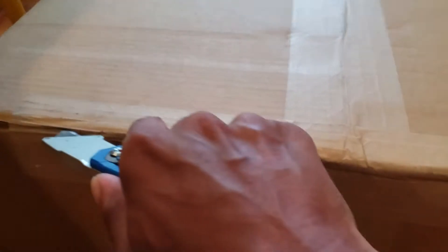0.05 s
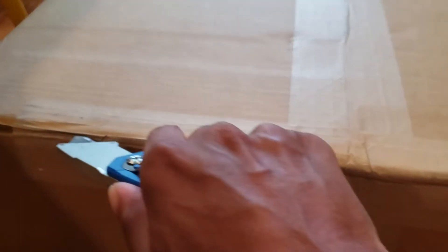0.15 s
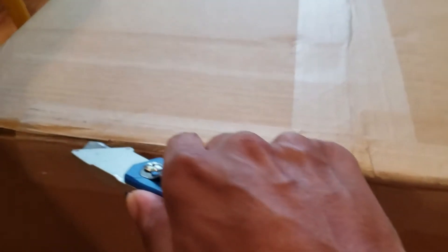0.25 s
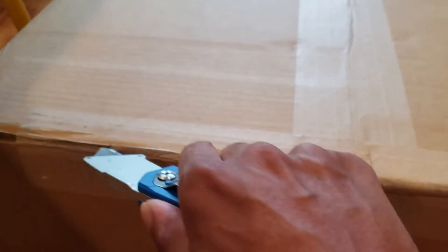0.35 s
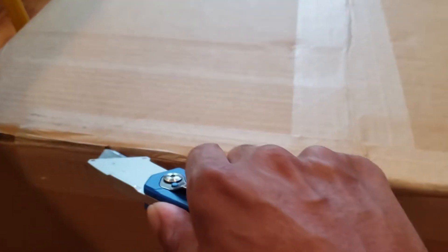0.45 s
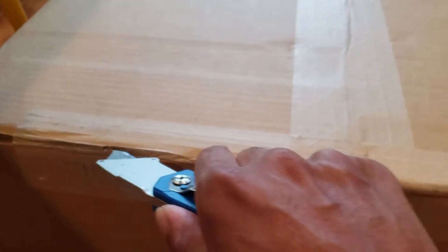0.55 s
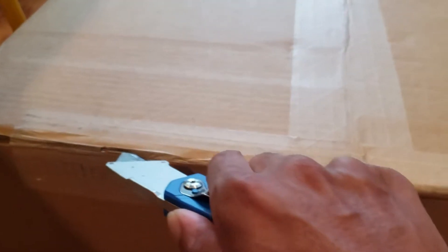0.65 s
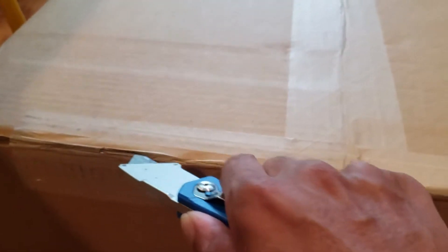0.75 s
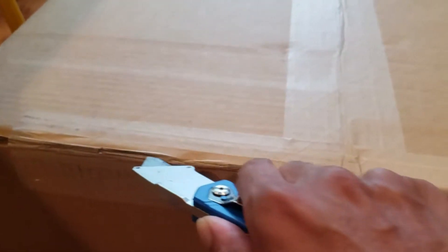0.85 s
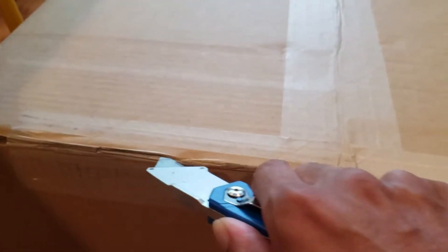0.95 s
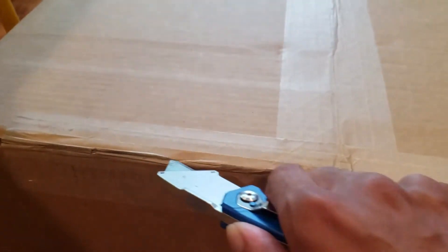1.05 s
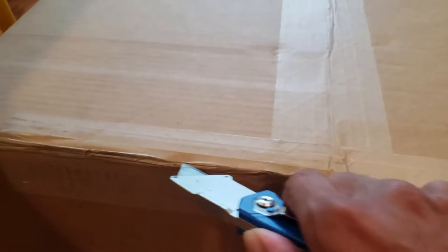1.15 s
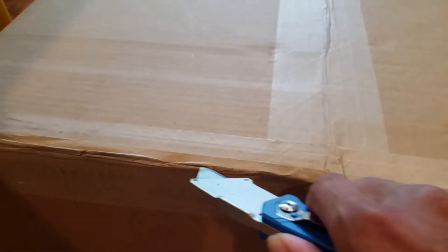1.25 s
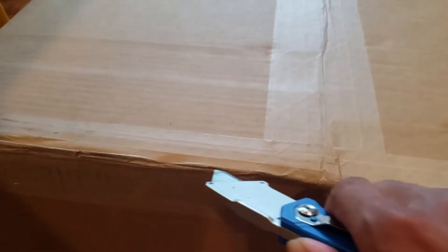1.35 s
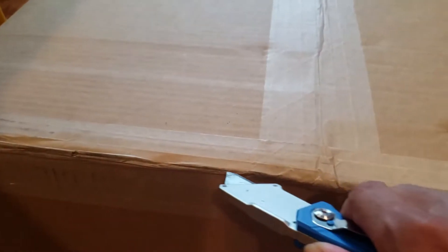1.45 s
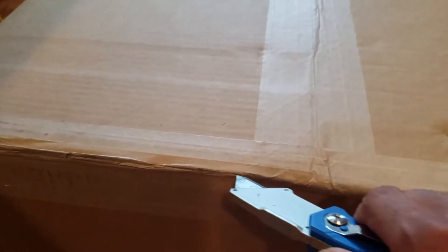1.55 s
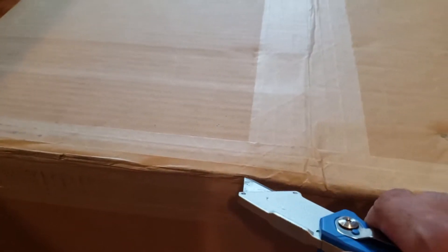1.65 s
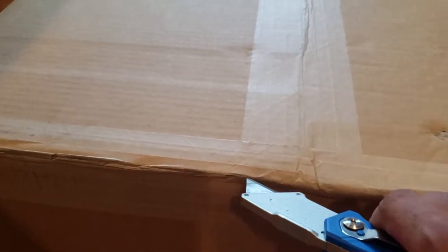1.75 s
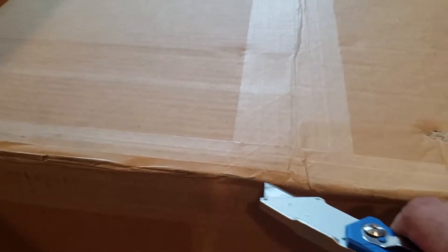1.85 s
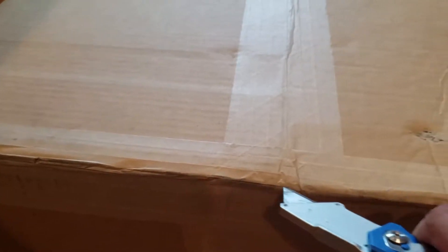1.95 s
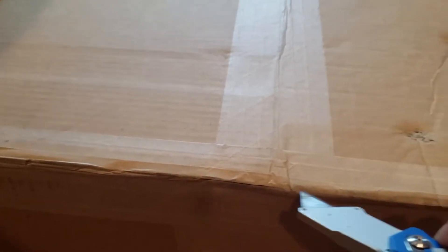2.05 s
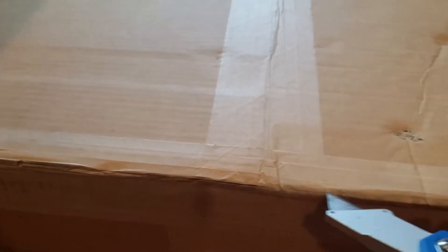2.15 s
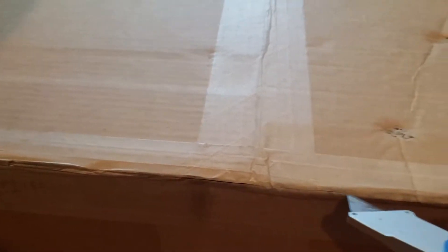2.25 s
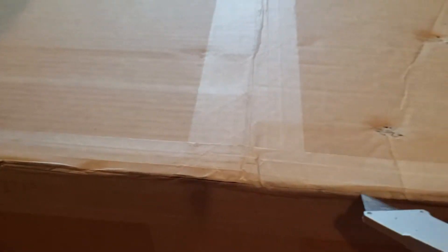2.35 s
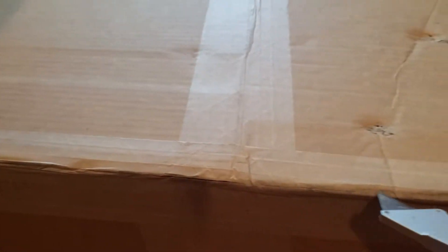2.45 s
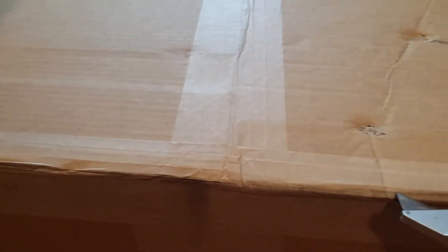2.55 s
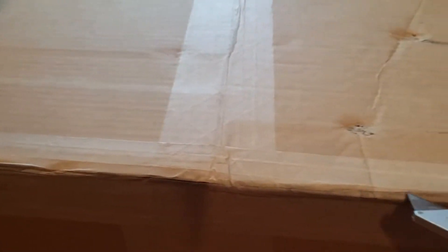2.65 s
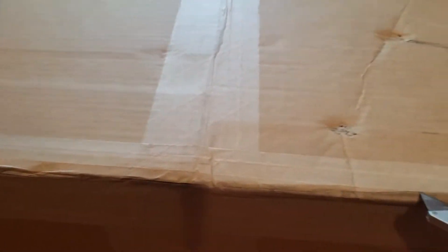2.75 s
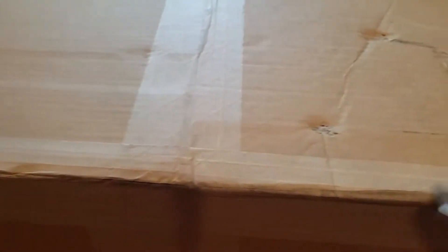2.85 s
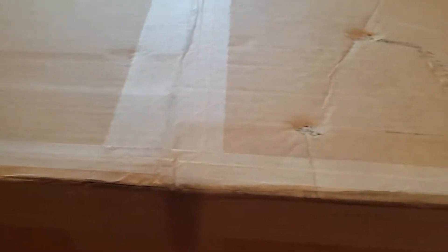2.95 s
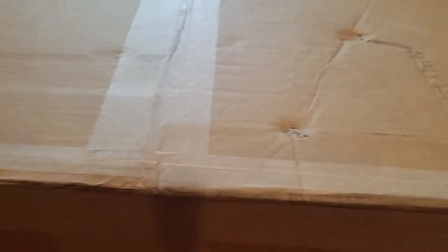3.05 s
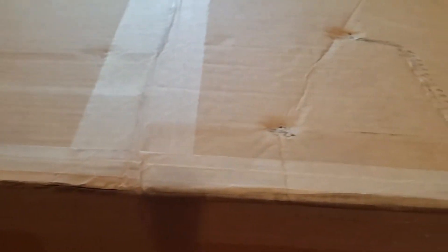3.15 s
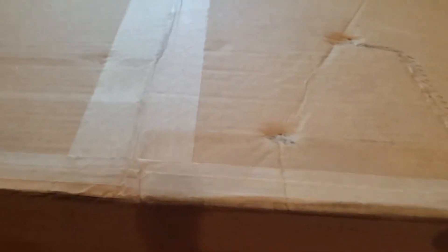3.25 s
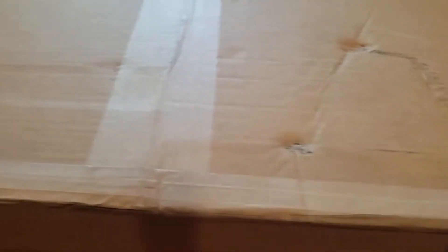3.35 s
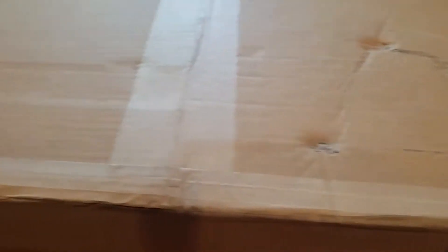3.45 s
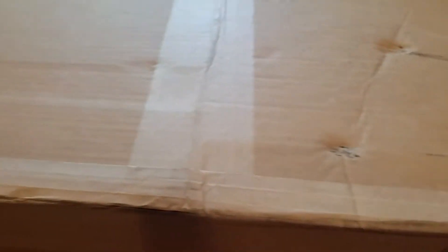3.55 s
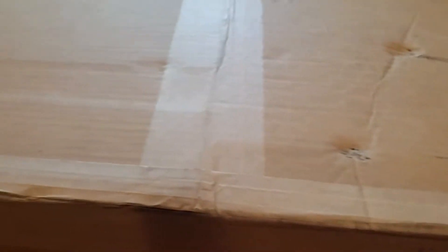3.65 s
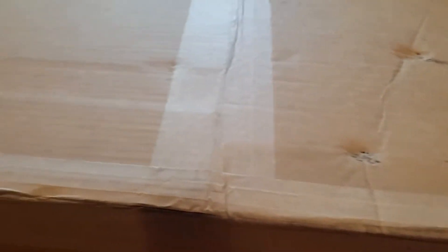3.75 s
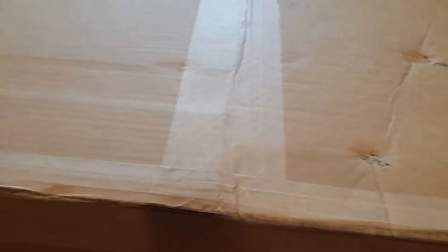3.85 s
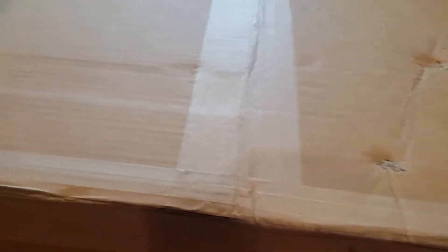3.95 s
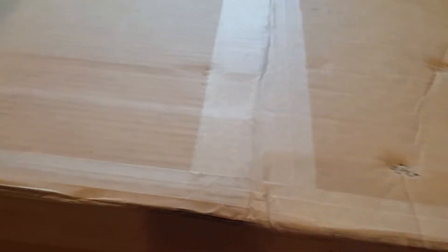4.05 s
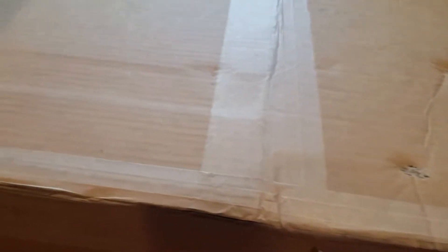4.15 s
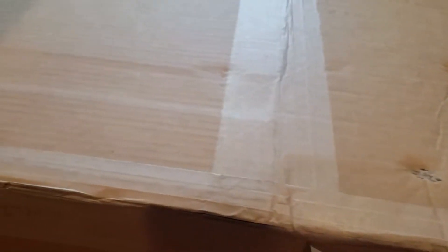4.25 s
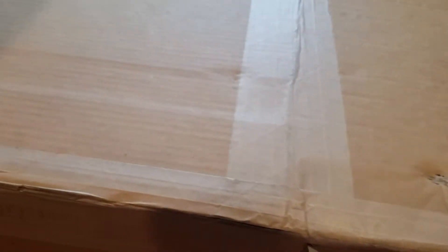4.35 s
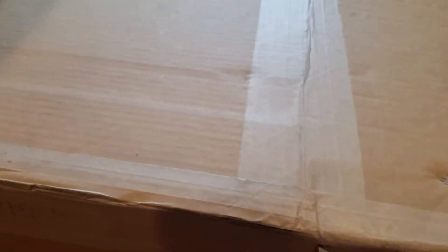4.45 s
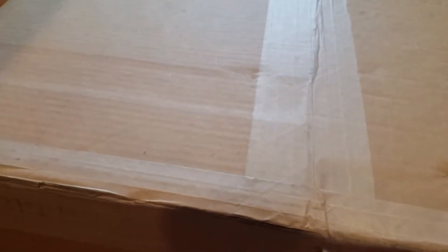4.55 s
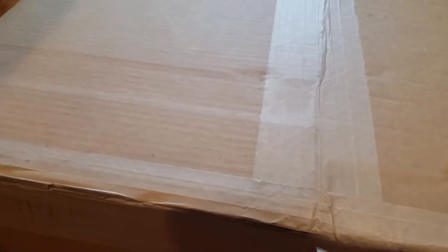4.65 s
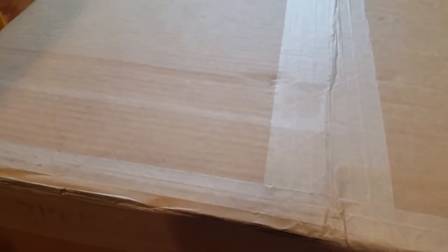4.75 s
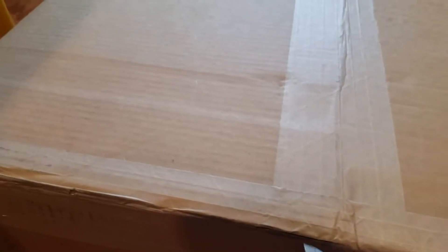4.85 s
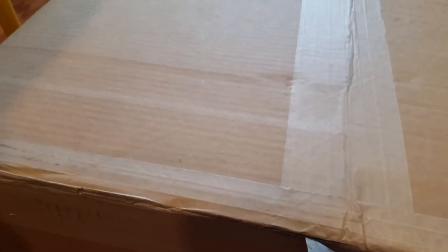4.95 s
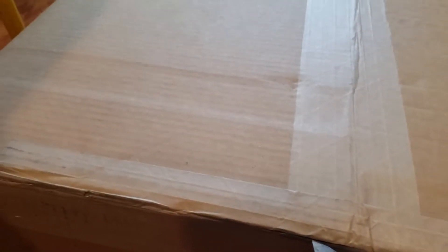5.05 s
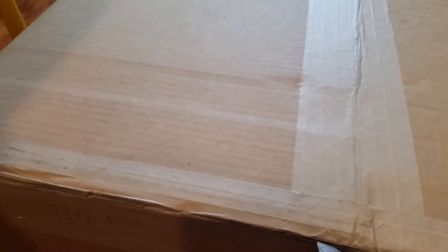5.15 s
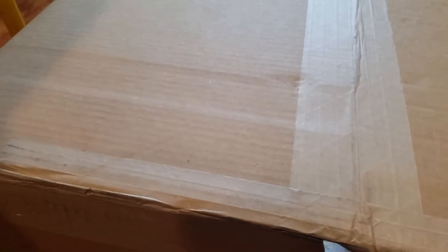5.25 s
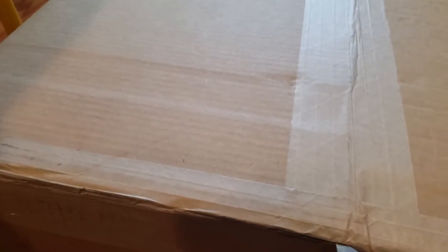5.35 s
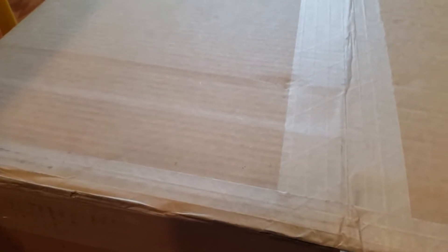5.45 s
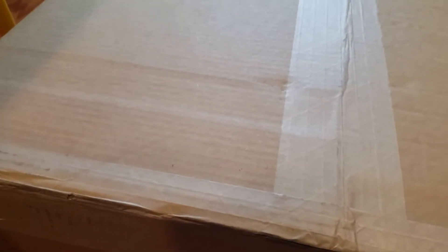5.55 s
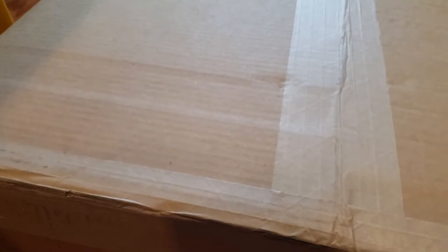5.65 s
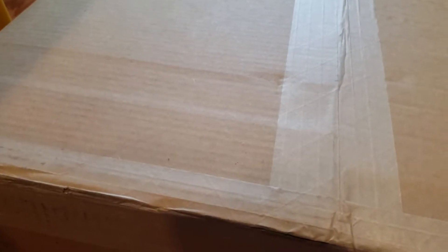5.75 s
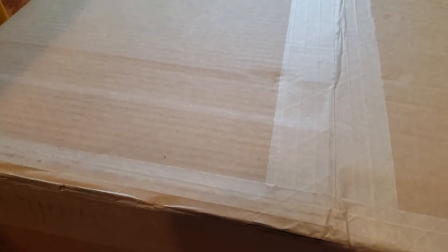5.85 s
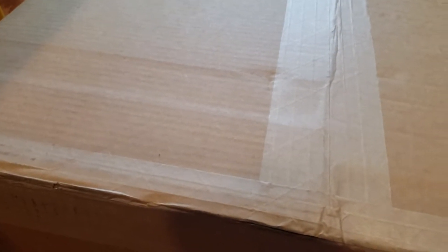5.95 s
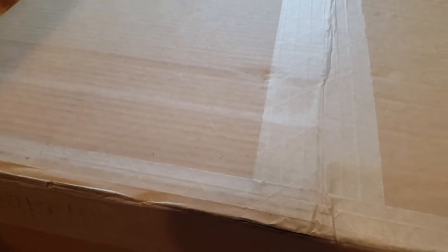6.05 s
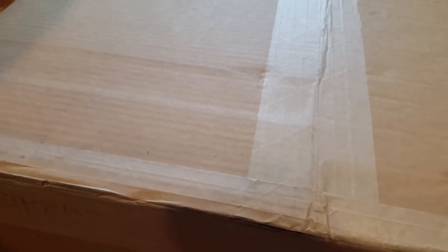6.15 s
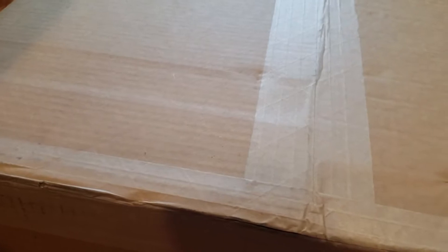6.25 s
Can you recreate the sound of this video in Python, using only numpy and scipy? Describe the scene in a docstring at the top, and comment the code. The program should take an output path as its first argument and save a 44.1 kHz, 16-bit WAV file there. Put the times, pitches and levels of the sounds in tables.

```python
"""In a small room, close by, a utility knife slits the packing tape along the edge of a cardboard box.
Stick-slip friction breaks film and fibres in tiny impulses: the tape crackles, the cut edge rasps and
the hollow box rumbles. The tip clicks on the board, and the lid thumps as the blade lets go.
One long cut with snags, a pause with a brief scuff and light clicks, then a second, harder cut,
all over a faint hum and hiss."""
import sys
import numpy as np
from scipy import signal
from scipy.fft import rfft, irfft
from scipy.io import wavfile

SR = 44100
rng = np.random.default_rng(int(sys.argv[2]) if len(sys.argv) > 2 else 0)


def generate_wav(sig):
    """Save sig (samples, or channels by samples) to the path in sys.argv[1] as 16-bit PCM at SR."""
    pcm = np.round(np.clip(np.atleast_2d(sig).T, -1, 1) * 32767).astype(np.int16)
    wavfile.write(sys.argv[1], SR, pcm)


N = 277429
TIME = np.arange(N) / SR
FILTER_SIZE = 8192
HZ = np.maximum(np.fft.rfftfreq(FILTER_SIZE, 1 / SR), 1)

# noise of the quiet room: (frequency [Hz], relative level [dB])
AMBIENT_SPECTRUM = [(15, -64), (25, -32.5), (41, -12.5), (64, -6.5), (76, -13), (82, -14), (134, -27),
                    (153, -29), (217, -24.5), (263, -39.5), (326, -34.5), (516, -45.5), (560, -44),
                    (7920, -59), (16000, -50.5)]
# likeness of that noise on the two sides: (frequency [Hz], correlation [-1 to 1])
AMBIENT_CORRELATION = [(100, 0.83), (400, 0.39), (1500, .1), (14000, .1)]
# modes of the panels and the cut edge: (frequency [Hz], bandwidth [Hz], lift [dB])
BOX_MODES = [(151.4, 30, 10.5), (226.3, 22, 8.5), (306, 62, 7), (496, 24, 7), (658, 30, 4.5), (977, 45, 6),
             (1390, 50, 4), (2430, 49, 2.5), (3240, 70, 2.5), (3975, 86, 4)]
# radiation of the box to the two sides: (frequency [Hz], left minus right [dB])
BOX_DIRECTIVITY = [(150, 0), (350, 3), (430, -8), (560, 0.5), (1000, -4), (1600, -1.5), (2000, -12.5),
                   (2450, -12), (2900, -9.5), (3400, -2), (4600, -1), (6900, 8), (8500, 1.5), (16000, -1)]
# likeness of the box's sound on the two sides: (frequency [Hz], correlation [-1 to 1])
BOX_CORRELATION = [(70, 0.27), (150, 1), (400, .72), (800, 0.58), (1200, 0.16), (2200, -0.088),
                   (3000, -0.62), (4400, -0.0028), (5700, -0.076), (7000, -0.29), (9500, 0.47),
                   (13000, 0.73)]
# spectra of the hollow box, the cut edge and the tape: (frequency [Hz], relative level [dB])
RUMBLE_SPECTRUM = [(40, -34), (60, -6.5), (85, -0.5), (120, -3.5), (190, -7.5), (255, -11.5), (400, -6.5),
                   (600, -8.5), (850, -10.5), (1200, -10), (1550, -7), (2300, -32)]
RASP_SPECTRUM = [(1200, -32.5), (1700, -5), (2100, 0), (2500, 3), (2900, 1.5), (3300, -2), (3800, -2.5),
                 (4400, -7), (5800, -21.5)]
CRACKLE_SPECTRUM = [(3600, -47), (4700, -2.5), (5600, -3), (7000, 1), (7700, -3.5), (8600, -13), (9800, -4),
                    (11000, -3.5), (12500, 1), (15500, 1.5), (17500, 0.5)]
# the lid springs back: (time [s], level [dB], upper mode [Hz])
LID_THUMPS = [(0.414, -42.5, 149.4), (0.594, -35, 159), (1.108, -44, 150), (1.252, -42, 145),
              (4.37, -49, 200), (4.536, -52, 214), (5.456, -44, 153), (5.651, -31, 137)]
# the tip catches or taps the board:
# (time [s], level [dB], resonance [Hz], bandwidth [Hz], left minus right [dB])
TIP_CLICKS = [(.033, -30.5, 2410, 1200, -14), (.411, -14.5, 2780, 885, -8), (.429, -20.5, 3000, 900, -4),
              (0.494, -41, 2880, 900, -8), (0.542, -31, 3150, 900, -6), (0.55, -40.5, 3180, 910, -10),
              (0.5761, -26, 2310, 800, -8.5), (0.5785, -13.5, 2670, 1100, -5.5),
              (3.026, -44, 1103, 140, -10), (3.043, -44.5, 1130, 140, -5), (4.328, -51, 2820, 70.2, -3),
              (4.536, -56, 682, 50.4, 5), (4.538, -43, 5500, 1860, 1), (4.909, -52, 3200, 1200, -10),
              (4.923, -40, 2830, 500, -12), (4.928, -35.5, 3700, 900, 13), (5.105, -41.5, 7370, 700, 11),
              (5.113, -42, 7250, 700, -2), (5.194, -52, 2780, 600, 6), (5.454, -24.5, 2800, 910, -10),
              (5.4555, -15.5, 6900, 1210, 2), (5.4573, -21, 1670, 400, -8)]
# the hand drives the blade on: (start [s], end [s], attack [s], level [dB], swell [dB],
# rumble offset [dB], panel resonance [Hz], edge resonance [Hz], resonance lift [dB])
HAND_PUSHES = [(0, 0.394, 0.0017, -45, 2, -4, 1050, 2000, 3.5),
               (.58, 0.631, .005, -41, 2.5, -3, 1060, 2090, 13),
               (0.625, 1.072, 0.11, -43, -1.5, -2.5, 1020, 2040, 4.5),
               (1.163, 1.641, 0.019, -41, -4, -6, 984, 1900, 6.5),
               (1.774, 1.965, 0.048, -36.5, 2, -6.5, 1000, 2470, 3),
               (2.067, 2.571, 0.021, -37, -0.5, -8, 820, 3300, 4),
               (2.566, 2.801, 0.038, -38.5, 3.5, -6, 690, 3300, 6),
               (2.836, 2.94, 0.041, -34, -6, -6, 1070, 1850, 5.5),
               (4.317, 4.377, 0.051, -46, -2.5, -2.5, 700, 2850, 6),
               (4.902, 4.991, 0.013, -66, -2, -1, 690, 2860, 6.5),
               (5.19, 5.32, .005, -50.5, 6, -5, 980, 2220, 9),
               (5.316, 5.46, 0.012, -42, -6.5, -3.5, 990, 2190, 4.5),
               (5.593, 5.752, 0.1, -37.5, -4, -4.5, 905, 3170, 6.5),
               (5.746, 6.149, .11, -37.5, -2, -6, 900, 3170, 6.5),
               (6.157, 6.287, 0.057, -34, -2, -10, 1233, 2390, 5.5)]
# the blade creeps in the slit, only where end follows start: (start [s], end [s], level [dB])
BLADE_CREEPS = [(0.578, 3.05, -48.5), (5.21, 8.9, -57), (5.618, 4.6, -41.5)]
# a shallow blade splits tape, a deep one rasps board: (time [s], bite as rasp over crackle [dB])
BLADE_BITE = [(0, -3.5), (1.1, -2.5), (1.6, -5), (1.72, -3), (1.85, -7), (2.4, -3.5), (2.75, 2.5),
              (2.9, -3), (3.04, 0), (4.35, -10), (4.95, -4), (5.22, -7), (5.45, -3.5), (5.55, -2),
              (5.7, -3), (6.29, -2.5)]
# the blade rips through a tough spot: (time [s], duration [s], level [dB], bite [dB])
BLADE_SNAGS = [(.140, 0.0064, -37, -6.5), (0.378, 0.0061, -48, -1), (0.58, .013, -31.5, 2),
               (1.153, 0.014, -30.5, -6.5), (1.24, 0.022, -29.5, -1.5), (1.608, 0.027, -39, -6),
               (2.024, 0.035, -36.5, -5.5), (2.072, 0.0094, -34, -6), (2.182, 0.046, -34, -5.5),
               (4.531, 0.014, -55, -10.5), (4.985, .008, -56, -12), (5.125, 0.016, -66.5, -11),
               (5.444, 0.011, -35.5, -8.5), (5.636, 0.0077, -31, -5.5), (5.666, 0.0074, -31.5, -2),
               (5.882, 0.0088, -36, -9), (5.925, 0.022, -32.5, -6.5)]
# the blade jerks when slow and glides when fast: (time [s], roughness [0 to 1])
BLADE_ROUGHNESS = [(0, .9), (1.1, 0.7), (1.8, .6), (2.3, 0.4), (2.9, 0.7), (4.3, 0.8), (5.4, 0.7),
                   (6.29, .7)]


def from_db(db):
    """Amplitude ratio of a level in decibels."""
    return 10 ** (np.asarray(db) / 20)


def unit_power(x):
    """Normalisation to a mean square of one."""
    return x / np.sqrt(np.mean(x ** 2) + 1e-20)


def at_hz(points):
    """Interpolation of (frequency, value) points on a logarithmic frequency axis."""
    hz, value = np.transpose(points)
    return np.interp(np.log(HZ), np.log(hz), value)


def sides(pan_db):
    """Constant-power panning: left and right gains for a level difference."""
    gain = from_db(np.array([[.5], [-.5]]) * pan_db)
    return gain / np.sqrt(np.mean(gain ** 2, axis=0))


def drift(per_s):
    """Random modulation of unit power, taking per_s new values a second."""
    knots = rng.standard_normal(N // 4)
    return unit_power(np.interp(TIME * per_s, np.arange(len(knots)), knots))


def gate(start, end, ramp_s):
    """Trapezoidal window between two times."""
    return np.clip(np.minimum(TIME - start, end - TIME) / ramp_s + .5, 0, 1)


def minimum_phase(gain):
    """Causality: an impulse response with these gains that never precedes its excitation."""
    cepstrum = irfft(np.log(gain + 1e-6))
    cepstrum[..., 1:FILTER_SIZE // 2] *= 2
    cepstrum[..., FILTER_SIZE // 2 + 1:] = 0
    return irfft(np.exp(rfft(cepstrum)))


def convolve(x, response):
    """Linear filtering by a left and a right impulse response."""
    return signal.oaconvolve(np.atleast_2d(x), response, axes=-1)[:, :N]


def resonance(x, hz, width_hz, lift_db):
    """Second-order resonance; a negative lift makes an anti-resonance."""
    damping, gain = np.tan(np.pi * width_hz / SR), from_db(lift_db / 2)
    tuning = -2 * np.cos(2 * np.pi * hz / SR)
    return signal.lfilter([1 + damping * gain, tuning, 1 - damping * gain],
                          [1 + damping / gain, tuning, 1 - damping / gain], x)


def radiate(pair, gain, correlation):
    """Partial coherence: in-phase and antiphase drives add to set the left-right correlation."""
    alike, gain = np.clip(at_hz(correlation), -.98, .98), unit_power(gain)
    in_phase = convolve(pair[0], minimum_phase(gain * np.sqrt((1 + alike) / 2)))
    antiphase = convolve(pair[1], minimum_phase(gain * np.sqrt((1 - alike) / 2)))
    return in_phase + antiphase * [[1], [-1]]


def background(hum_hz=58.5, hum_db=-61.5, wander_rad=.2, noise_db=-62, low_cut_hz=60):
    """Ambient noise: a low hum, wavering by phase modulation, over faint rumble and hiss."""
    hum = unit_power(np.sin(2 * np.pi * hum_hz * TIME + wander_rad * drift(per_s=4)))
    colour = from_db(at_hz(AMBIENT_SPECTRUM)) * sides(pan_db=1.5)
    noise = radiate(rng.standard_normal((2, N)), colour, AMBIENT_CORRELATION)
    noise = signal.sosfilt(signal.butter(2, low_cut_hz, "high", fs=SR, output="sos"), noise)
    return from_db(hum_db) * hum * sides(pan_db=.97) + from_db(noise_db) * noise


def reverberation(x, first_s=.008, bass_hz=400, top_hz=8000, bass_t60_s=.32, upper_t60_s=.26):
    """Diffuse reflections decay exponentially; the bass lingers and the top is dulled."""
    age = TIME[:SR // 2]
    noise = rng.standard_normal((2, len(age))) * (age > first_s)
    bass = signal.sosfilt(signal.butter(2, bass_hz, fs=SR, output="sos"), noise)
    upper = signal.sosfilt(signal.butter(1, [bass_hz, top_hz], "band", fs=SR, output="sos"), noise)
    tail = bass * from_db(-60 * age / bass_t60_s) + upper * from_db(-60 * age / upper_t60_s)
    return convolve(x, tail / np.sqrt(np.sum(tail ** 2) / 2))


def lid_thumps(rise_s=.005, decay_s=.026, low_ratio=.62, low_gain=.5):
    """Damped free vibration: the released lid swings in two low modes."""
    age, out = TIME[:SR // 3], np.zeros(N)
    envelope = (1 - np.exp(-age / rise_s)) * np.exp(-age / decay_s)
    for start, db, hz in LID_THUMPS:
        phase, at = 2 * np.pi * hz * age, int(start * SR)
        swing = (np.sin(phase) + low_gain * np.sin(low_ratio * phase)) * envelope
        out[at:at + len(age)] += from_db(db) * swing / np.abs(swing).max()
    return sides(pan_db=1.5) * out


def tip_clicks(scatter_s=.0033, scatter_gain=.16, tick_gain=.23):
    """Impulse excitation: a pulse, scattered by the board, rings one mode under a bright tick."""
    age, out = TIME[:SR // 15], np.zeros((2, N))
    for start, db, hz, width_hz, pan_db in TIP_CLICKS:
        pulse = scatter_gain * rng.standard_normal((2, len(age))) * np.exp(-age / scatter_s)
        pulse[:, 0] = 1
        radius = np.exp(-np.pi * width_hz / SR)
        feedback = [1, -2 * radius * np.cos(2 * np.pi * hz / SR), radius ** 2]
        ring = signal.lfilter([1, -1], feedback, pulse)
        tick = tick_gain * np.diff(pulse, prepend=0)
        snap = resonance(ring + tick, hz=8900, width_hz=2200, lift_db=-9)
        at = int(start * SR)
        out[:, at:at + len(age)] += from_db(db) * sides(pan_db) * snap / np.abs(snap).max()
    return out


def reflections(x, decay_s=.0039, step_s=.17):
    """Multipath propagation: waves bounce in the material along paths that change as the blade moves."""
    age, step = TIME[:SR // 30], int(step_s * SR)
    out = np.zeros(N + 4 * step + len(age))
    fade = np.sin(np.linspace(0, np.pi, 2 * step))
    padded = np.pad(x, (step, 3 * step))
    paths = rng.standard_normal((N // 2000, len(age))) * np.exp(-age / decay_s)
    for at, path in zip(range(0, N + step, step), paths):
        echo = signal.fftconvolve(padded[at:at + 2 * step] * fade, path / np.linalg.norm(path))
        out[at:at + len(echo)] += echo
    return out[step:step + N]


def cardboard(pair, spectrum, reflected_share=.64):
    """Forced vibration: the box radiates through its modes; reflections reach each side differently."""
    antiphase = np.sqrt(reflected_share) * reflections(pair[0]) + np.sqrt(1 - reflected_share) * pair[1]
    modes_db = sum(db / (1 + (2 * (HZ - hz) / width) ** 2) for hz, width, db in BOX_MODES)
    gain = from_db(at_hz(spectrum) + modes_db) * sides(at_hz(BOX_DIRECTIVITY))
    return radiate((pair[0], antiphase), gain, BOX_CORRELATION)


def along_the_seam(x, panel_width=.13, edge_width=.063, panel_dip=1.2, edge_dip=.5, dip_ratio=1.22):
    """Local resonance: each push reaches a spot where panel and cut edge ring at their own pitches."""
    out = x.copy()
    ends = [row[0] for row in HAND_PUSHES[1:]] + [N / SR]
    for (start, *_, panel_hz, edge_hz, lift_db), end in zip(HAND_PUSHES, ends):
        near = gate(start, end, ramp_s=.047)
        span = slice(np.argmax(near > 0), N - np.argmax(near[::-1] > 0))
        local = x[:, span]
        for hz, width, dip in ((panel_hz, panel_width, panel_dip), (edge_hz, edge_width, edge_dip)):
            local = resonance(local, hz, width * hz, lift_db)
            # an anti-resonance lies just above each peak
            local = resonance(local, dip_ratio * hz, width * hz, -dip * lift_db)
        out[:, span] += near[span] * (local - x[:, span])
    return out


def bare_board(x, start_s=4.2, end_s=5.15):
    """Friction noise depends on the surface: off the tape the tip hisses lower, with less sparkle."""
    rub = resonance(x, hz=4700, width_hz=2400, lift_db=6)
    dulled = resonance(rub, hz=13900, width_hz=5000, lift_db=-4)
    return x + gate(start_s, end_s, ramp_s=.04) * (dulled - x)


def partition(bite_db, box_db, box_per_bite=.3):
    """Energy partition: the depth of the bite sets the gains of rumble, rasp and crackle."""
    return from_db([box_db + box_per_bite * bite_db, bite_db / 2, -bite_db / 2]).reshape(3, -1)


def push(start, end, attack_s, swell_db, release_db_per_s=241.5):
    """Envelope of one push: it builds, swells or tires, then decays exponentially as the blade slows."""
    attack = np.clip((TIME - start) / attack_s, 0, 1)
    progress = np.clip((TIME - start) / (end - start), 0, 1)
    release_db = release_db_per_s * np.clip(TIME - end, 0, 1)
    return attack * from_db(swell_db * (progress - .5) - release_db)


def blade_drive(waver_db=.74):
    """Amplitude modulation: the strongest of unsteady push, creep and snag drives each of the parts."""
    drive = np.zeros((3, N))
    for start, end, attack_s, db, swell_db, box_db, *_ in HAND_PUSHES:
        stroke = from_db(db) * push(start, end, attack_s, swell_db)
        drive = np.maximum(drive, partition(0, box_db) * stroke)
    for start, end, db in BLADE_CREEPS:
        creep = from_db(db) * gate(start, end, ramp_s=.02)
        drive = np.maximum(drive, partition(0, box_db=-4.5) * creep)
    bite_db = np.interp(TIME, *np.transpose(BLADE_BITE))
    drive *= partition(bite_db, box_db=0) * from_db(waver_db * drift(per_s=24))
    for start, duration, db, snag_bite_db in BLADE_SNAGS:
        snag = from_db(db) * gate(start, start + duration, ramp_s=.002)
        drive = np.maximum(drive, partition(snag_bite_db, box_db=-8.5) * snag)
    return drive


def fractures(grip, per_s, spread_db):
    """Acoustic emission: tiny random breaks, scaled by the grip, each radiate in their own direction."""
    breaks = rng.random(N) < per_s / SR
    size = from_db(spread_db * np.minimum(rng.exponential(1, N), 4))
    angle = rng.uniform(0, 2 * np.pi, N)
    return unit_power(breaks * size * grip * np.array([np.cos(angle), np.sin(angle)]))


def cutting(slip_per_s=550, slip_db=2.0, rib_per_s=110, rib_db=1.5, sheen=.69):
    """Stick-slip friction and the board's slower ribs modulate the breaks in box, edge and tape alike."""
    roughness = np.interp(TIME, *np.transpose(BLADE_ROUGHNESS))
    grip = from_db(roughness * (slip_db * drift(slip_per_s) + rib_db * drift(rib_per_s)))
    box, edge, tape = blade_drive()
    rumble = cardboard(box * fractures(grip, per_s=8000, spread_db=2.14), RUMBLE_SPECTRUM)
    rasp = cardboard(edge * fractures(grip, per_s=14000, spread_db=1.9), RASP_SPECTRUM)
    film = tape * fractures(grip, per_s=22000, spread_db=3.0)
    # the taut film rings briefly, giving the crackle a shifting sheen
    ringing_film = (film[0] + sheen * reflections(film[0])) / np.hypot(1, sheen)
    crackle = cardboard((ringing_film, film[1]), CRACKLE_SPECTRUM)
    return rumble + rasp + crackle


def scene(room_db=-15.5):
    """Superposition of the direct sound of knife and box, its reverberation and the ambient noise."""
    direct = along_the_seam(bare_board(cutting()) + tip_clicks()) + lid_thumps()
    return direct + from_db(room_db) * reverberation(direct) + background()


def record(dry, cutoff_hz=15800):
    """Band limiting: a steep elliptic low-pass removes the highest treble."""
    return signal.sosfilt(signal.ellip(12, .1, 80, cutoff_hz, fs=SR, output="sos"), dry)


dry = scene()
out = record(dry)
generate_wav(out)
```